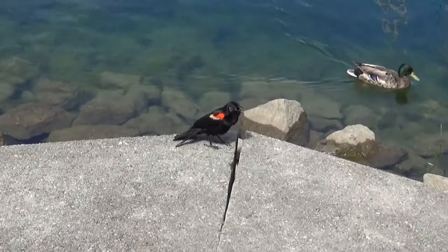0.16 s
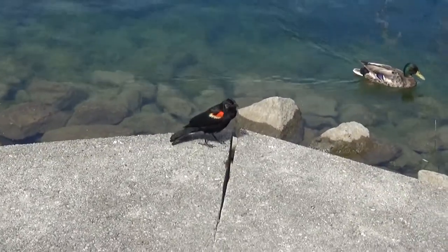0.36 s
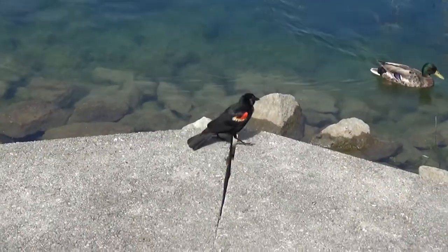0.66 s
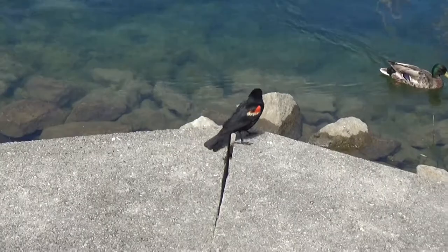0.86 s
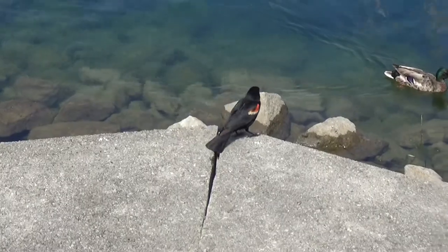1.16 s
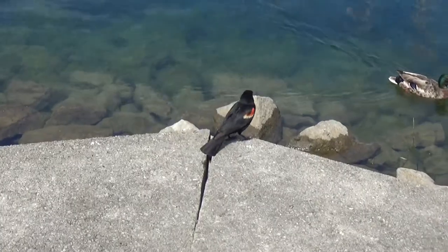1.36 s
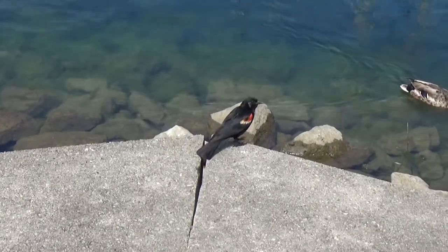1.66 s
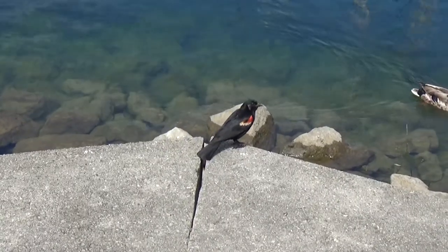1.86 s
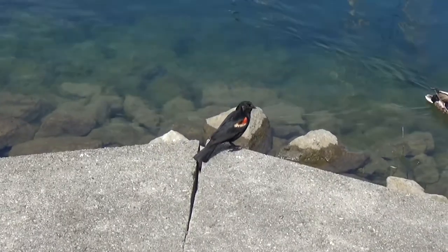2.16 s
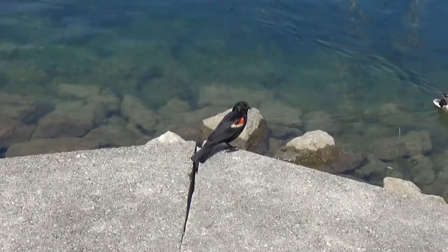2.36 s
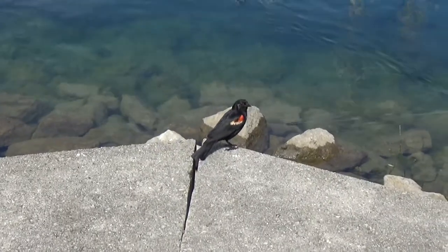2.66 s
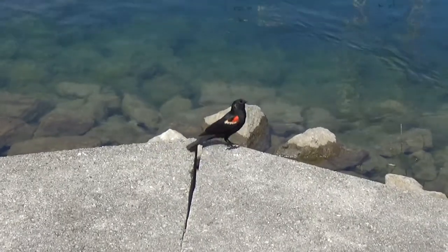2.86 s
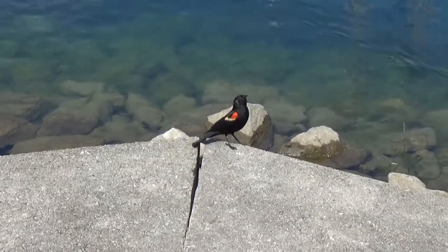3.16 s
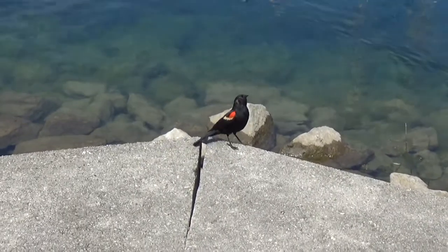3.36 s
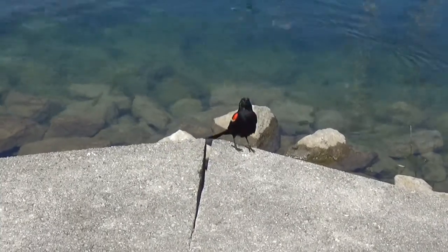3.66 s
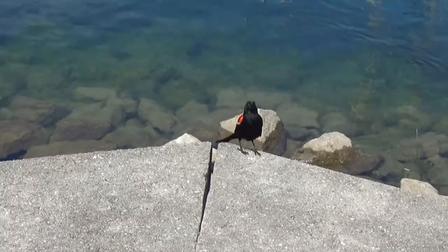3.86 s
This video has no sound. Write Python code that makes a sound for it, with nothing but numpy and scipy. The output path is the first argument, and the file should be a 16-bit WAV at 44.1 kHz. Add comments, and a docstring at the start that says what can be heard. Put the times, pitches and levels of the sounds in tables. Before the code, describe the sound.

A bird's high, buzzing trill sounds close by and stops almost at once. The lakeside then stays quiet: low rumble, light wind on the microphone, far birds chirping and soft gritty scrapes, with a light tap later on.

```python
"""A red-winged blackbird on a concrete ledge by a lake ends a buzzy trill: one tiny syllable of
up and down sweeps from both sides of the syrinx, about 47 times a second, echoed by the shore.
It stops at 0.2 s, leaving low outdoor rumble and faint ticking. The rumble swells briefly, then
light wind gusts on the microphone. Far birds chirp from 0.5 s and soft scuffs follow from 0.7 s.
A light tap comes at 2.6 s, another bird's hoarse chuck at 3.5 s."""
import sys
import numpy as np
from scipy import signal
from scipy.fft import rfft, irfft, next_fast_len
from scipy.io import wavfile
from scipy.ndimage import uniform_filter1d

SR = 44100
rng = np.random.default_rng(int(sys.argv[2]) if len(sys.argv) > 2 else 0)


def unload_wav(signal):
    """Save mono or channel-first audio to the path in sys.argv[1] as 16-bit WAV at rate SR, clipped to [-1, 1]."""
    wavfile.write(
        sys.argv[1],
        SR,
        np.round(np.clip(np.atleast_2d(signal).T, -1, 1) * 32767).astype(np.int16),
    )


N = 176400
T = np.arange(N) / SR


def amp(db):
    """Decibels to gain."""
    return 10 ** (np.asarray(db) / 20)


def unit(x):
    """Scale to rms 1."""
    return x / np.sqrt(np.mean(x ** 2) + 1e-20)


def curve(points, at, column=1):
    """Table column, linearly interpolated."""
    table = np.array(points)
    return np.interp(at, table[:, 0], table[:, column])


def log_curve(points, hz):
    """Table interpolated over log frequency."""
    f, value = np.transpose(points)
    return np.interp(np.log(hz + 1), np.log(f), value)


def add(mix, t_s, sound):
    """Mix a sound in at t_s."""
    at = round(t_s * SR)
    sound = sound[max(-at, 0):]
    part = mix[max(at, 0):][:len(sound)]
    part += sound[:len(part)]


def coloured(x, spectrum):
    """Filter by a spectrum."""
    size = next_fast_len(N + 4096)
    gain = amp(log_curve(spectrum, np.fft.rfftfreq(size, 1 / SR)))
    return irfft(rfft(x, size) * gain, size)[:N]


def noise(spectrum):
    """Steady coloured noise, rms 1."""
    return unit(coloured(rng.standard_normal(N), spectrum))


def band(hz, width_hz):
    """Gaussian noise band, rms 1."""
    f = np.fft.rfftfreq(N, 1 / SR)
    return unit(irfft(rfft(rng.standard_normal(N)) * np.exp(-.5 * ((f - hz) / width_hz) ** 2), N))


def arch(t_s, length_s):
    """Half-sine envelope."""
    return np.sin(np.pi * np.clip((T - t_s) / length_s, 0, 1))


def reverb(x, wet_db, t60_s):
    """Diffuse outdoor tail, different at each ear."""
    tail = rng.standard_normal((2, SR)) * amp(-60 * T[:SR] / t60_s)
    tail = tail + .5 * tail[::-1]
    return amp(wet_db) * signal.fftconvolve(x[None], tail / np.linalg.norm(tail[0]), axes=1)[:, :N]


# syrinx side A, rise then steep fall: t/ms, f/Hz, level/dB
SWEEP_A = [(-2.5, 2500, -22), (-.4, 2810, -5), (.2, 3290, 2), (1.3, 4290, -4), (1.8, 5300, -26),
           (3.6, 6320, -19), (4.4, 5360, -19), (5.8, 4770, 1), (6.6, 3850, -1), (7.5, 3660, -1),
           (8.1, 3100, -13), (13.6, 3550, -15), (17.3, 3300, -11)]
# side B, low note then tumbling high note: t/ms, f/Hz, level/dB
SWEEP_B = [(1, 2550, -21), (2.5, 2990, -4), (4.7, 2870, -10), (6.2, 2970, -31), (8.1, 4700, -15),
           (11.1, 4950, -12), (15.6, 5150, -8), (16.6, 4550, -9), (18, 3800, -2), (19, 3400, -10),
           (20.6, 3120, -8), (21.9, 2690, -28)]
# harmonics 2-4: level/dB
HARMONICS_DB = [-32, -41, -58]


def syllable(voice, t_s, level_db, pitch_ratio, cutoff_ms=np.inf):
    """Each side of the syrinx sweeps a nearly pure tone, mixed into voice."""
    ms = np.arange(-130, 1100) / SR * 1000
    for sweep in (SWEEP_A, SWEEP_B):
        detune, scatter_db = rng.normal(0, .008), rng.normal(0, .7)
        waver = .009 * unit(uniform_filter1d(rng.standard_normal(len(ms)), size=40))
        hz = curve(sweep, ms) * pitch_ratio * (1 + detune + waver)
        phase = 2 * np.pi * np.cumsum(hz) / SR + rng.uniform(0, 2 * np.pi)
        tone = np.sin(phase) + sum(amp(db) * np.sin(k * phase) for k, db in enumerate(HARMONICS_DB, 2))
        gate = (ms > sweep[0][0]) & (ms < min(sweep[-1][0], cutoff_ms))
        envelope = amp(curve(sweep, ms, column=2) + level_db + scatter_db) * gate
        add(voice, t_s + ms[0] / 1000, uniform_filter1d(envelope, size=20) * tone)


# syllables: t/s, level/dB, pitch ratio
TRILL = [(-.0093, 2, 1), (0.011, 1.5, 1), (.033, -1.5, 0.99), (.054, 0.5, 0.98), (.0755, -0.5, 1),
         (0.0976, -2.5, 1), (0.1186, -3.5, 0.99), (.140, -2, 1), (0.1612, -2, 0.99), (.181, -3.5, 0.96)]
# throat and beak response: f/Hz, level/dB
THROAT_RESPONSE = [(1000, -28.5), (2050, -16), (2500, 3), (3000, -2), (4000, -1.5), (4450, -5), (5100, 1),
                   (5600, -11), (6050, -2.5), (7000, -2.5)]
# hiss in the voice: f/Hz, level/dB
RASP_SPECTRUM = [(500, -6.5), (1200, -3.5), (2100, -5), (4000, 10), (6500, -2), (8500, -5), (10200, -3),
                 (12200, -21), (14700, -6), (15500, -20)]


def blackbird():
    """Syllables through throat and beak; rasp and undertone follow their level."""
    voice = np.zeros(N)
    for row in TRILL:
        syllable(voice, *row)
    syllable(voice, t_s=.2005, level_db=-5.5, pitch_ratio=.97, cutoff_ms=6.6)
    effort = np.sqrt(abs(uniform_filter1d(voice ** 2, size=400)))
    rasp = amp(-23) * noise(RASP_SPECTRUM)
    undertone = amp(-36) * band(hz=1691, width_hz=86)
    return amp(-3.5) * (coloured(voice, THROAT_RESPONSE) + effort * (rasp + undertone))


# near reflections: delay/ms, level/dB, pan (+1 left)
REFLECTIONS = [(1.3, -10, .2), (3.0, -12, -.3), (5.7, -17, .35), (7.4, -15, -.35), (11.0, -17, .3),
               (14.3, -16, -.3)]


def shore_echoes(voice):
    """Direct sound, near reflections and the shore's tail."""
    near = np.array([voice, voice])
    for delay_ms, db, pan in REFLECTIONS:
        for ear, sign in zip(near, (1, -1)):
            add(ear, delay_ms / 1000, amp(db) * (1 + sign * pan) * voice)
    return near + reverb(voice, wet_db=-29, t60_s=.82)


# rumble and hiss: f/Hz, level/dB
RUMBLE_SPECTRUM = [(15, -44), (25, -13.5), (75, -3), (119, -3), (152, -6.5), (274, -6.5), (349, -15.5),
                   (389, -10), (552, -21.5), (614, -18), (722, -21.5), (895, -23.5), (2420, -34.5),
                   (4040, -38.5), (4870, -40), (8130, -43.5), (15500, -50.5)]
# left-right likeness: f/Hz, correlation
RUMBLE_CORRELATION = [(30, 1), (350, 0.99), (650, 0.78), (1100, 0.624), (2500, 0.23), (6000, 0.41),
                      (10000, .98)]
# slow drift: t/s, level/dB
RUMBLE_DRIFT = [(0, 1), (.7, 1), (1.2, 1), (1.8, 2), (2.3, 1), (2.9, 0), (3.3, 1), (3.6, 2), (4, 1)]


def rumble(level_db=-41.5, patch_db=1.5):
    """Distant rumble and hiss in drifting patches."""
    hz = np.fft.rfftfreq(2048, 1 / SR)
    a, b, c, d, patches = rng.standard_normal((N // 512 + 5, len(hz), 5)).T
    patches = uniform_filter1d(patches, size=16, axis=0)
    patches = unit(uniform_filter1d(patches, size=8, axis=1))
    gain = amp(log_curve(RUMBLE_SPECTRUM, hz)[:, None] + patch_db * patches)
    correlation = log_curve(RUMBLE_CORRELATION, hz)[:, None]
    left = a + 1j * b
    right = correlation * left + np.sqrt(1 - correlation ** 2) * (c + 1j * d)
    _, air = signal.istft(np.array([left, right]) * gain, nperseg=2048, noverlap=1536)
    return unit(air[:, :N]) * amp(level_db + curve(RUMBLE_DRIFT, T))


def far_ticking(rate_hz=29.5):
    """Faint ticking that comes and goes over a thin whine, like insects."""
    pulses = (.5 + .5 * np.cos(2 * np.pi * rate_hz * T)) ** 3
    envelope = unit(pulses * amp(2 * band(hz=0, width_hz=3.5)))
    ticks = amp(-72) * envelope * band(hz=2900, width_hz=200)
    whine = amp(-77) * band(hz=7900, width_hz=67)
    return ticks + whine


def rumble_swell():
    """One band of the distant rumble swells briefly."""
    return amp(-44) * arch(t_s=.25, length_s=.27) * band(hz=330, width_hz=175)


# buffeting: f/Hz, level/dB
WIND_SPECTRUM = [(20, -8), (45, -5), (80, 1), (130, -2), (220, -13.5), (600, -61), (3000, -89)]
# gusts: t/s, level/dB
WIND_GUSTS = [(0, -69), (.3, -58), (.4, -40.5), (.58, -43.5), (.68, -33.5), (.78, -45), (.95, -37),
              (1.12, -42), (1.3, -65), (1.55, -45.5), (1.75, -47), (2.05, -64), (2.87, -54.5), (2.96, -47),
              (3.15, -59), (4, -66.5)]


def wind():
    """Light gusts on the microphone, mostly common to both channels."""
    common = noise(WIND_SPECTRUM)
    separate = amp(-10.5) * np.array([noise(WIND_SPECTRUM), noise(WIND_SPECTRUM)])
    return (common + separate) * amp(curve(WIND_GUSTS, T))


# chirps: t/s, length/s, start f/Hz, end f/Hz, level/dB
FAR_CHIRPS = [(0.48, 0.023, 4900, 4100, -57), (.495, .02, 8500, 8500, -63), (.54, 0.023, 3870, 4220, -57.5),
              (0.543, .02, 8460, 8760, -62), (0.59, .018, 8450, 8460, -62), (1.02, 0.058, 3950, 4080, -61),
              (1.383, .025, 4250, 4070, -59), (1.435, 0.032, 3600, 4150, -59),
              (1.727, 0.032, 3030, 4480, -52.5), (1.743, .025, 4700, 3850, -55.5),
              (2.253, 0.013, 3510, 2700, -52.5), (2.36, 0.024, 4700, 3920, -55),
              (2.417, .02, 4250, 4050, -58), (2.432, 0.022, 3610, 2960, -63),
              (2.84, .07, 2030, 2004, -55.5), (3.357, 0.0093, 2600, 3510, -51),
              (3.399, 0.014, 3430, 3280, -59), (3.62, .028, 6800, 6700, -61),
              (3.734, 0.019, 8700, 8900, -61), (3.81, .03, 8800, 8650, -62)]


def far_birds():
    """Thin wavering glides, blurred by distance."""
    chirps = np.zeros(N)
    waver_hz = 130 * band(hz=0, width_hz=130)
    for t_s, length_s, start_hz, end_hz, db in FAR_CHIRPS:
        progress = np.arange(0, 1, 1 / (length_s * SR))
        hz = start_hz + (end_hz - start_hz) * progress + waver_hz[round(t_s * SR):][:len(progress)]
        tone = np.sin(2 * np.pi * np.cumsum(hz) / SR)
        add(chirps, t_s, amp(db) * np.sin(np.pi * progress) * tone)
    return chirps + reverb(chirps, wet_db=-4, t60_s=.2)


# scrapes: t/s, length/s, level/dB, tilt/(dB/octave)
SCUFF_STROKES = [(0.695, 0.14, -53, -2), (1.12, 0.2, -55.5, -3.5), (1.655, 0.12, -55, -5),
                 (1.875, 0.13, -52, -2.5), (1.954, 0.2, -55, -0.5), (2.679, 0.11, -52.5, -2.5),
                 (2.755, 0.18, -61, 0), (3.626, .07, -60, 2), (3.865, 0.097, -60.5, 5)]
# scrape noise before tilt: f/Hz, level/dB
SCUFF_SPECTRUM = [(300, -10), (1000, -8.5), (2700, 1.5), (3800, -4), (6000, -5), (8500, -8), (11000, -16),
                  (15000, -28)]


def scuffs():
    """Soft gritty scrapes, some dull, some bright."""
    scrapes = np.zeros(N)
    grit = unit(amp(2 * band(hz=0, width_hz=147)))
    for t_s, length_s, db, tilt in SCUFF_STROKES:
        spectrum = [(hz, level + tilt * np.log2(hz / 1000)) for hz, level in SCUFF_SPECTRUM]
        scrapes += amp(db) * arch(t_s, length_s) * grit * noise(spectrum)
    return scrapes + reverb(scrapes, wet_db=-5, t60_s=.3)


# tap noise: f/Hz, level/dB
TAP_SPECTRUM = [(200, -14), (600, 2), (1250, 4), (2500, -9), (6000, -16), (9000, -32), (15000, -32)]


def tap(t_s=2.592, decay_s=.009, level_db=-42):
    """One light tap: a fast-decaying noise burst."""
    envelope = (T > t_s) * np.exp(-abs(T - t_s) / decay_s)
    return amp(level_db) * envelope * noise(TAP_SPECTRUM)


# hoarse part of the call: f/Hz, level/dB
CHUCK_SPECTRUM = [(1200, -25), (1900, -4), (2350, -1), (2800, -13), (3500, -6), (4200, -32), (9000, -21),
                  (15000, -37)]


def chuck(pitch_hz=2350):
    """A far bird's short call: noise around a wavering tone."""
    waver_hz = 130 * band(hz=0, width_hz=130)
    tone = amp(-50) * np.sin(2 * np.pi * np.cumsum(pitch_hz + waver_hz) / SR)
    call = arch(t_s=3.487, length_s=.04) * (tone + amp(-49) * noise(CHUCK_SPECTRUM))
    return call + reverb(call, wet_db=-4, t60_s=.2)


def scene():
    """The blackbird in front of the lakeside."""
    trill = shore_echoes(blackbird())
    background = rumble() + far_ticking() + rumble_swell() + wind()
    return trill + background + far_birds() + scuffs() + tap() + chuck()


def record(dry, threshold_db=-17, ratio=2.67, release_db_per_s=80, ceiling_db=-3.5, knee=3.94):
    """Gain control holds the trill down; then soft clip and low-pass."""
    power_db = 10 * np.log10(abs(uniform_filter1d((dry ** 2).mean(0), size=600)) + 1e-12)
    release_db = T * release_db_per_s
    peak_db = np.maximum.accumulate(power_db + release_db) - release_db
    over_db = np.maximum(peak_db - threshold_db, 0)
    held = dry / amp((1 - 1 / ratio) * uniform_filter1d(over_db, size=200))
    rounded = held / (1 + abs(held / amp(ceiling_db)) ** knee) ** (1 / knee)
    lowpass = signal.firwin(511, cutoff=15750, window=("kaiser", 9), fs=SR)
    return signal.oaconvolve(rounded, lowpass[None], "same")


dry = scene()
out = record(dry)
unload_wav(out)
```